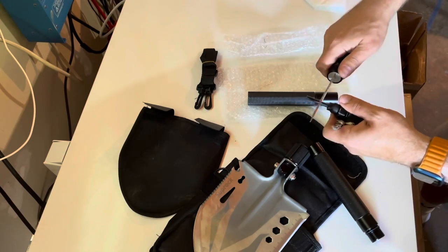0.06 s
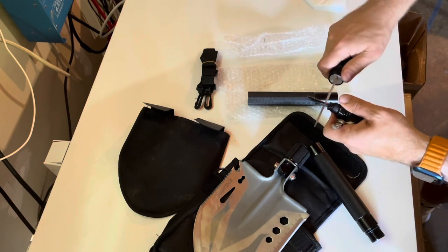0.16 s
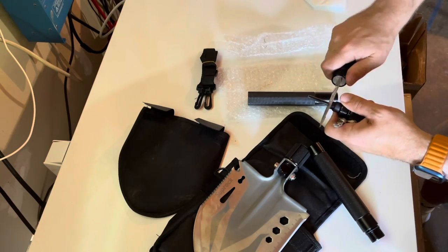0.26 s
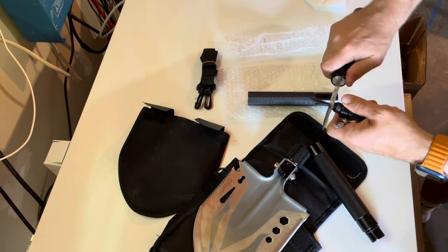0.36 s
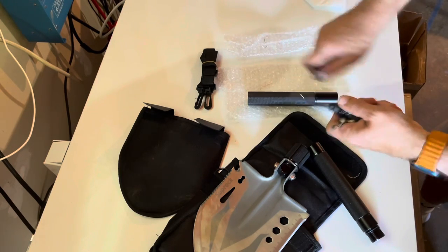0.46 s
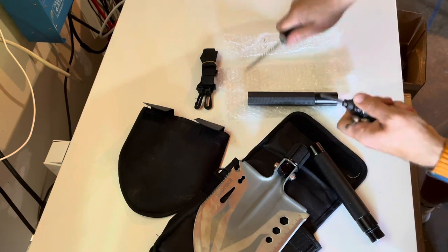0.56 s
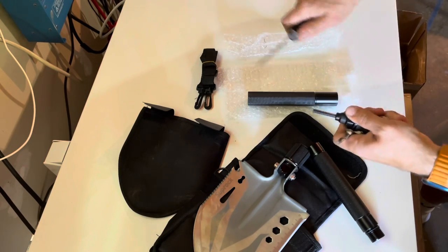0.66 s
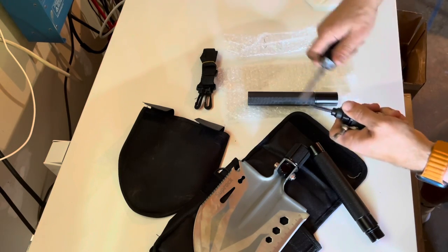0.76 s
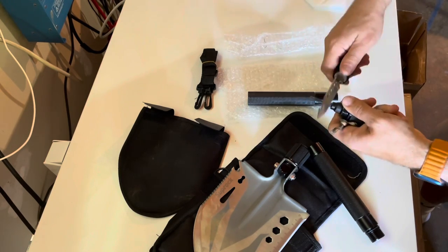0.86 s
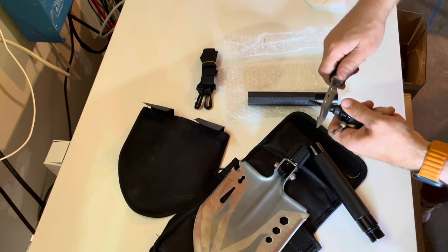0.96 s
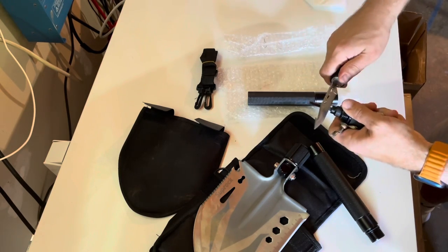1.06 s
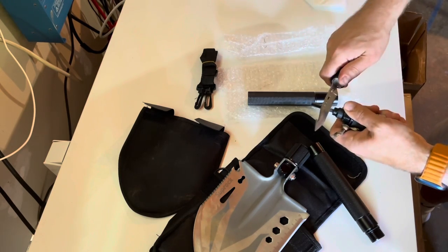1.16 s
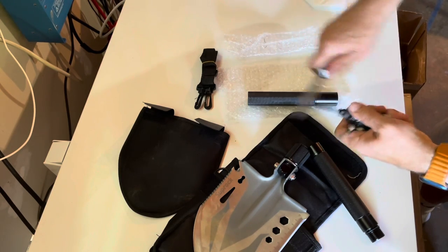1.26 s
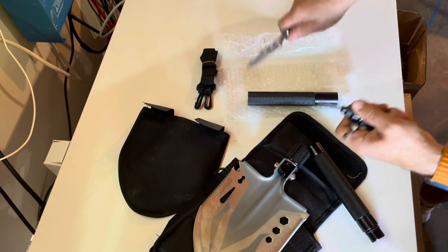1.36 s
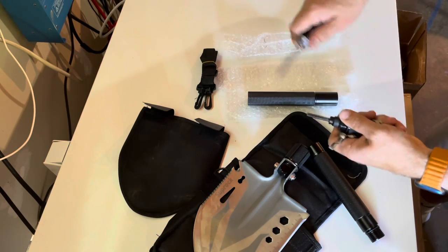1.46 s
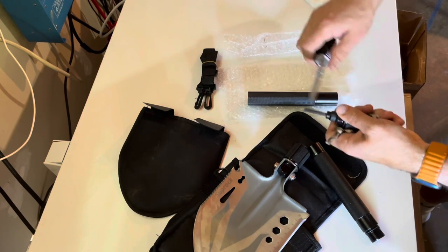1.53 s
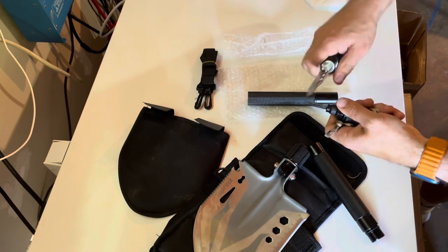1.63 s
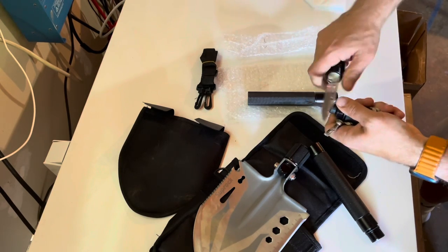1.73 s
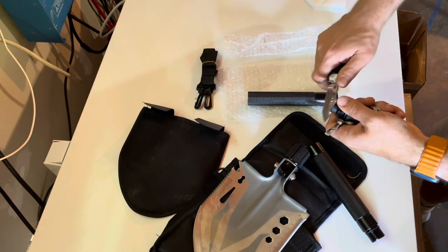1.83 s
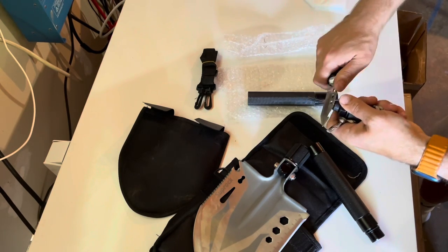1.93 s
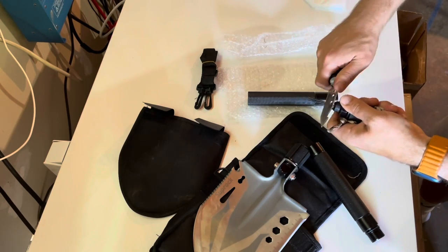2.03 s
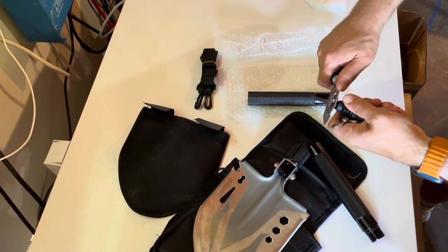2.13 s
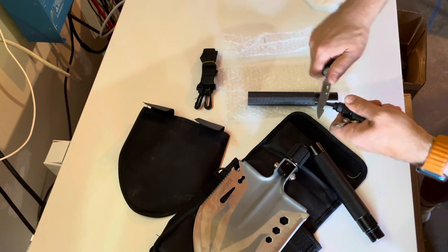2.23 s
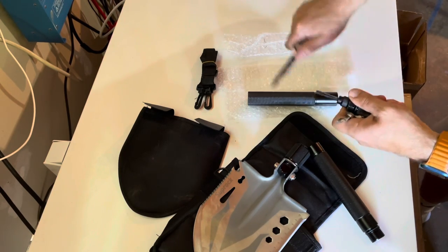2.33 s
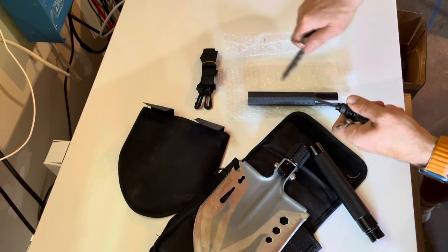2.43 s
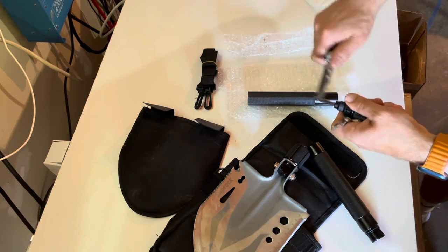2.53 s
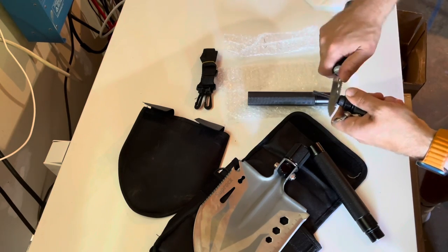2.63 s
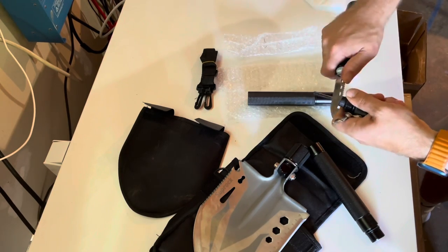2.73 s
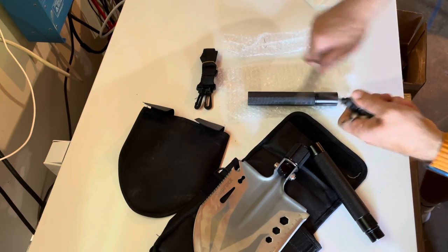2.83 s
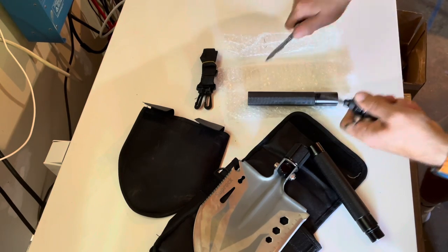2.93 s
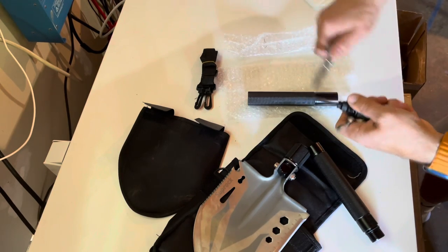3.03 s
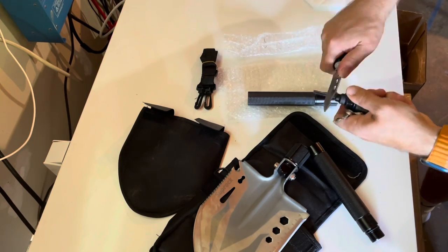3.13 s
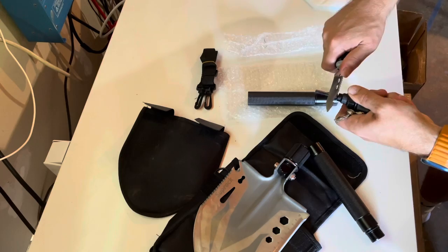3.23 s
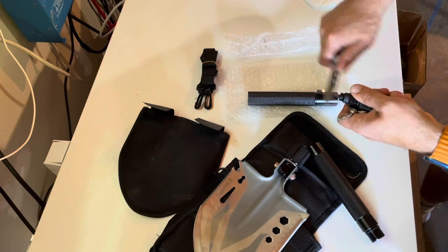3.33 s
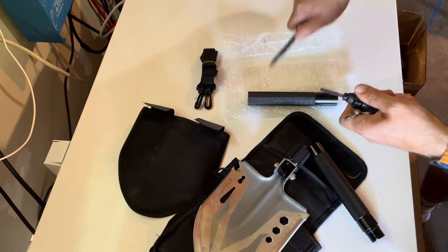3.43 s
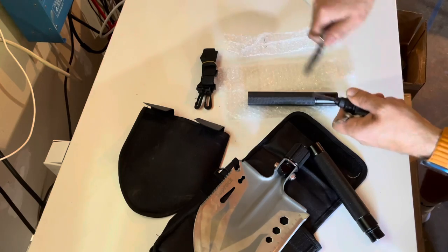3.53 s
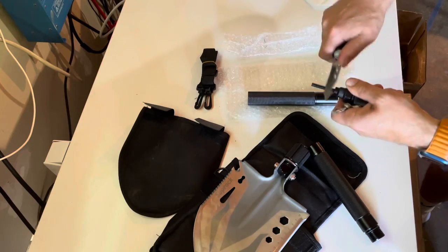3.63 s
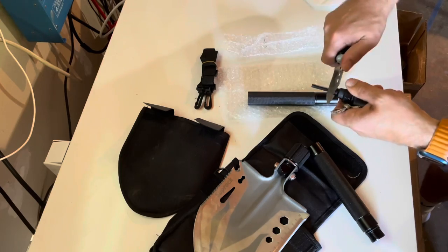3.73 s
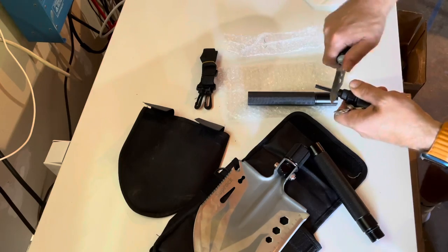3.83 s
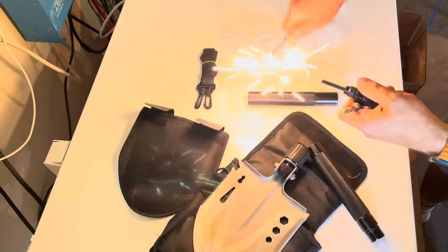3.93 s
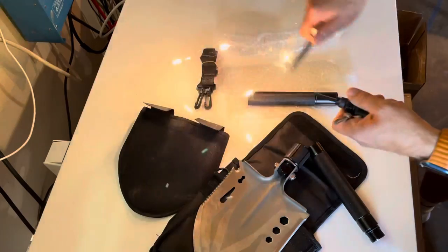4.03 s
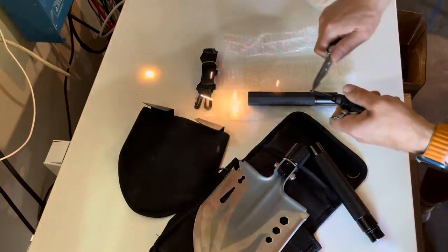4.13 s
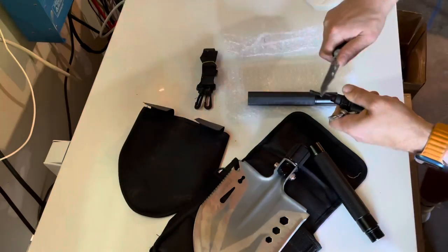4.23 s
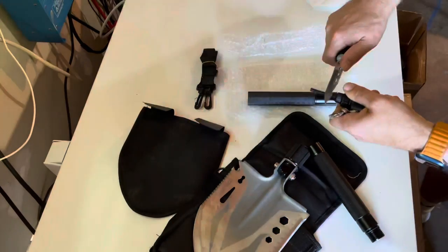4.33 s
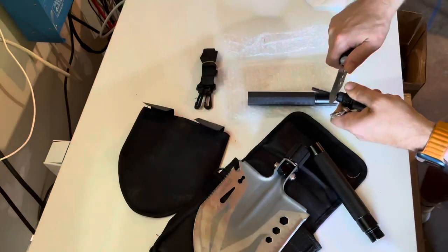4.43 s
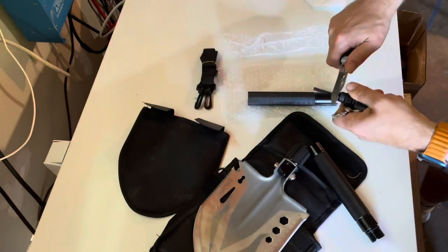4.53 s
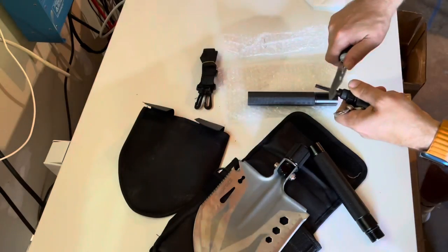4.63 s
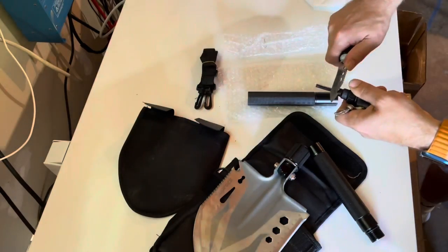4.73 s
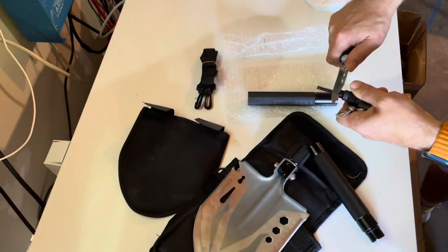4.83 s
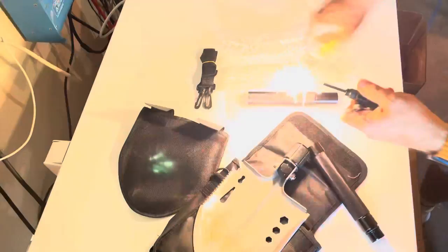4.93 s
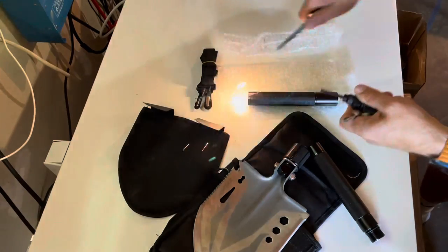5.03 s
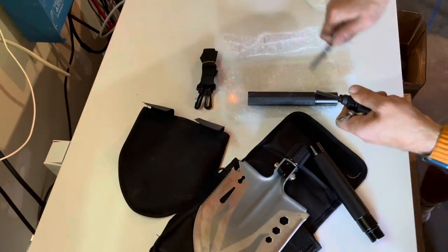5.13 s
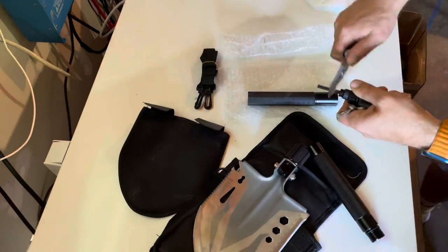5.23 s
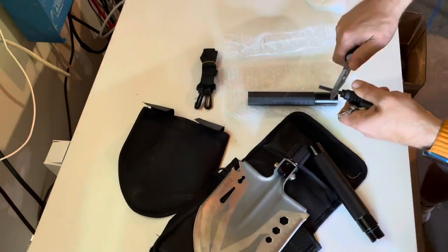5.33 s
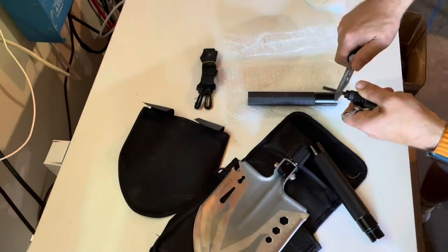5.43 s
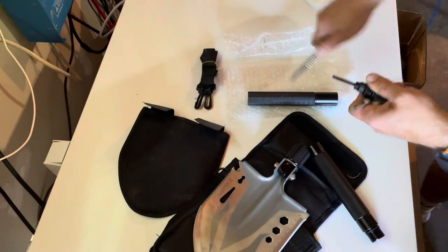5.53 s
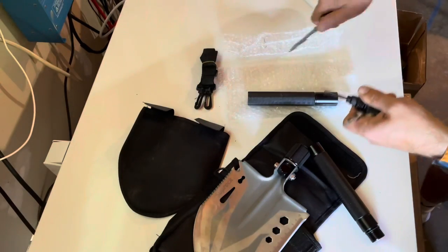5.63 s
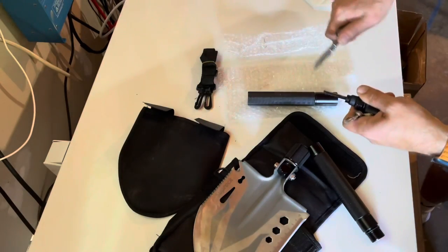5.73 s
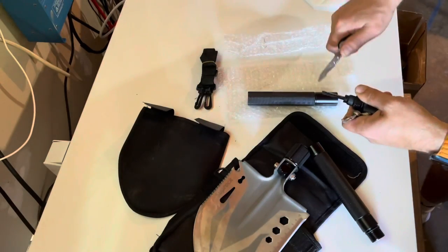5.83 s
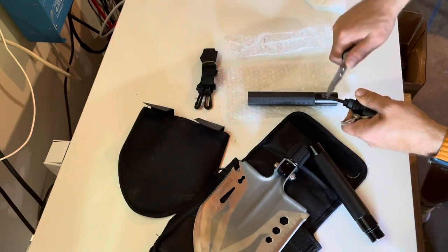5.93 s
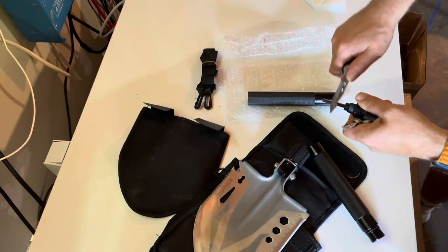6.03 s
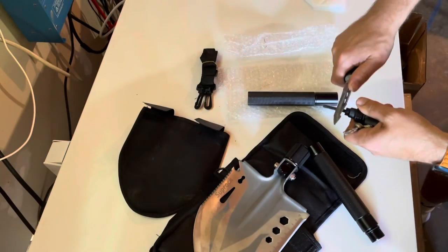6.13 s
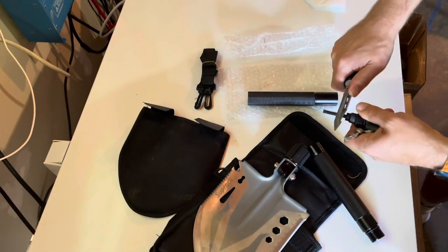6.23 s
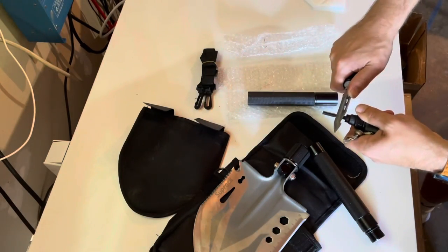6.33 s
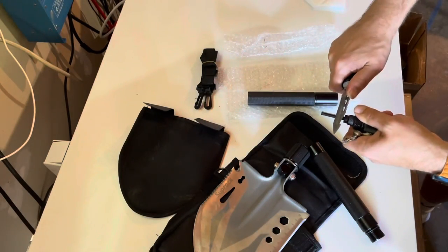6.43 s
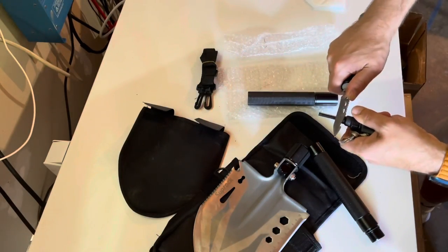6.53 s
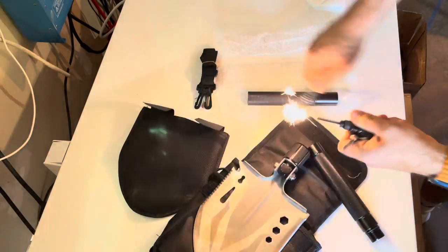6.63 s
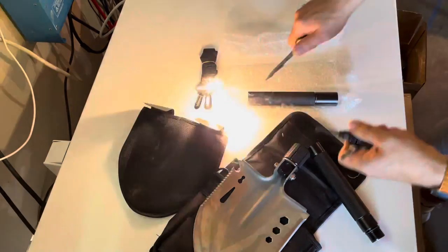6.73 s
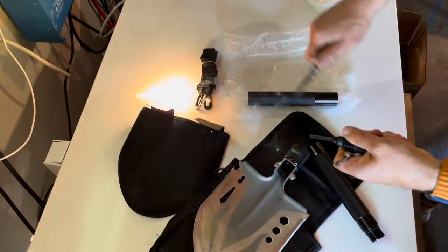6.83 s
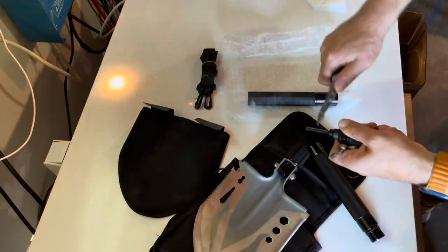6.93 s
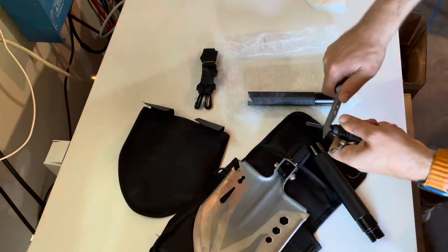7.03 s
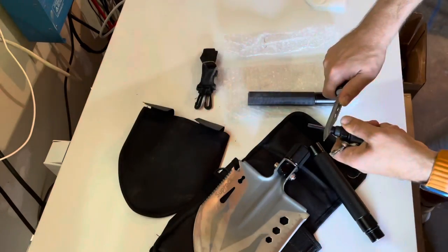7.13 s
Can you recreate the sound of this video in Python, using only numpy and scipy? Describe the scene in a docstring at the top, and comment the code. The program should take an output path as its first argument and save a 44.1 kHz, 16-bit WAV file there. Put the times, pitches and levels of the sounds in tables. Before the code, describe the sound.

Sharp metallic clicks and short hissing scrapes of a knife on a fire-starter rod, a few throwing softly fluttering sparks indoors.

```python
"""A steel blade taps onto a fire-starter rod and scrapes along it, again and again, over a table indoors.
Torn-off grit hisses, the blade rings and chirps, and the rod hums in its holder. One hard stroke
sticks and slips into a squeal; a few throw sparks that burn with a low flutter. A small room answers
and ventilation rumbles faintly. Two close microphone ports hear it all with a phase turn in the treble."""
import sys
import numpy as np
from scipy import signal
from scipy.fft import rfft, irfft, next_fast_len
from scipy.io import wavfile
from scipy.ndimage import uniform_filter1d, map_coordinates

SR = 44100
rng = np.random.default_rng(int(sys.argv[2]) if len(sys.argv) > 2 else 0)


def wav_out(sig):
    """Save sig, one row per channel (or a flat mono array), as 16-bit PCM at SR to the path in sys.argv[1]."""
    wavfile.write(sys.argv[1], SR, np.round(np.clip(np.atleast_2d(sig).T, -1, 1) * 32767).astype(np.int16))


N = 316058

# Resonances of the steel blade: pitch_hz, width_hz, level_db
BLADE_MODES = [(1215, 66, 2), (1232, 12, -4.5), (2610, 200, 1), (2740, 9.8, 4.5), (2730, 80, -6),
               (3507, 150, 4), (3980, 110, -6.5), (5585, 120, 4.5), (6500, 440, -8), (7800, 310, 2.5),
               (9210, 1200, -5.5), (10840, 450, 2), (11740, 180, -5), (13100, 81, -5.5), (14800, 400, -10)]
# Course of the squealing stroke: time_s, slip_rate_hz, slip_db, tilt_db_per_overtone, grit_db, bright_db
SQUEAL_CURVE = [(.449, 1140, -61.5, -3, -47, -41.5), (0.451, 1183, -27.5, -1.5, -42, -35),
                (0.457, 1183, -19.5, 0, -36, -35), (.464, 1233, -20.5, 0.74, -30.5, -33.5),
                (0.47, 1290, -18, -0.01, -21.5, -19), (0.476, 1343, -24, -1.5, -27, -26.5),
                (0.481, 1340, -47.5, -1.4, -47.5, -41.5)]


def blade_on_rod():
    """Torn-off grit hisses in three bands and sets the rod humming; the blade rings, squeals and chirps."""
    # Low band of scrapes and taps: freq_hz, level_db
    body_eq = [(200, -48.5), (450, -22.5), (700, -4), (1000, 1), (2000, -1.5), (2800, -14), (5000, -59)]
    # Middle band of a scrape: freq_hz, level_db
    grit_eq = [(800, -59.5), (1700, -19), (2400, -4), (4000, -1), (6000, -1), (7800, -3.5), (9000, -10.5),
               (14000, -59)]
    # Middle band of a tap: freq_hz, level_db
    tick_eq = [(800, -59.5), (1700, -19), (2400, -11), (3200, 1.5), (4200, 1), (6000, -1.5), (7800, -5.5),
               (9000, -19.5), (14000, -60)]
    # Top band of scrapes and taps: freq_hz, level_db
    bright_eq = [(4000, -62.5), (7000, -21.5), (8300, 3), (10500, 3.5), (12500, -2), (15600, -4),
                 (15900, -32.5), (17000, -37)]
    rod_hz, rod_width_hz, ring_db = 519, 30, -16
    scrape, tap = strokes(), taps()
    _, body, bright, hum = scrape + tap
    middle = scrape[0] * coloured(grit_eq, patchy_db=2.5) + tap[0] * coloured(tick_eq, patchy_db=0)
    hiss = middle + body * coloured(body_eq, patchy_db=3.1) + bright * coloured(bright_eq, patchy_db=2.0)
    bending = hum * np.cos(2 * np.pi * rod_hz * np.arange(N) / SR + 2.4 * wobble(30))
    rod = filtered(bending, lambda hz: modes([(rod_hz, rod_width_hz, 4)], hz)) * [[1], [.4]]
    ring = amp(ring_db) * filtered(hiss, lambda hz: modes(BLADE_MODES, hz))
    return hiss + ring + rod + squeal() + chirps()


def strokes():
    """The edge scrapes, catching and letting go unevenly: envelopes of grit, body, brightness, rod hum."""
    # Pushes along the rod: bite_s, rise_s, hold_s, release_s, grit_db,
    # body_offset_db, bright_offset_db, hum_offset_db (offsets from the grit)
    pushes = [(.168, 0.081, 0.002, 0.043, -59.5, -9, -9, -17),
              (0.222, 0.017, 0.001, 0.0027, -58, 0.5, -13, -26),
              (0.455, 0.023, 0.0011, .002, -44, -9.5, -5, -13),
              (0.676, 0.016, 0.022, .025, -71, -12, 4, -9),
              (0.814, .012, 0.0268, 0.0029, -62.5, -13, -0.5, -15),
              (1.159, 0.013, 0.03, .003, -66.5, -10.5, 2.5, -20),
              (1.198, 0.012, .002, 0.023, -49, -9, 1.5, -11),
              (1.248, .012, .008, 0.0046, -40, -5.5, 0, -27),
              (1.265, 0.0088, .006, 0.025, -28, -15.5, 7.5, -24),
              (1.593, .05, 0.076, 0.062, -85, -15, 14, 0), (2.187, 0.034, .006, .012, -41, -5, 7.5, -1),
              (2.22, .004, 0.0058, .004, -41, -7, 5.5, -3),
              (2.231, .011, .008, .012, -31, -11.5, 0.5, -19.5),
              (2.798, 0.049, 0.0025, 0.019, -37, -8, 3.5, -19),
              (3.315, 0.019, .002, .012, -39.5, -12.5, -0.5, -10),
              (3.326, 0.012, .011, 0.019, -37, -6, 2.5, -5.5),
              (3.819, 0.011, 0.013, 0.0032, -46.5, -5.5, 3, -1.5),
              (3.844, 0.014, .004, 0.016, -30.5, -14, -1, -8),
              (3.865, 0.018, .015, 0.057, -35, -5.5, 3, -17),
              (3.924, 0.024, 0.0016, 0.02, -42, -7.5, 4, -32.5),
              (4.355, 0.048, 0.017, .035, -53, -13, -8.5, -25),
              (4.898, 0.011, .012, 0.0031, -50, -7.5, 3.5, -0.5),
              (4.914, 0.0056, .004, 0.0047, -43.5, -6, 0.5, -19),
              (4.924, .011, .03, 0.032, -34, -6.5, 2.5, -20),
              (5.495, 0.028, .009, 0.0026, -37.5, -7.5, 0.5, -12.5),
              (6.499, 0.036, 0.0023, .04, -64.5, -2, -6.5, -24.5),
              (6.593, 0.011, .015, .003, -49, -7.5, 8, -9.5),
              (6.62, 0.011, .055, 0.033, -34, -10.5, 2, -21),
              (6.698, 0.024, .022, 0.0094, -39, -11, 0, -15), (6.746, .011, .002, .03, -61, 2, 10, -15),
              (6.783, .005, 0.0022, 0.035, -57, -13, -5, -16)]
    rise_depths, release_depths = [0.88, 0.85, 1.05, 0.46], [1.7, 0.91, 1.6, .9]  # one per envelope
    envelopes = np.zeros((4, N))
    for *timing, grit_db, body_db, bright_db, hum_db in pushes:
        layers = zip([0, body_db, bright_db, hum_db], rise_depths, release_depths)
        envelopes += [swell(*timing, grit_db + offset_db, up, down) for offset_db, up, down in layers]
    times_s, *_, grit_db, bright_db = np.transpose(SQUEAL_CURVE)  # the squealing stroke hisses too
    envelopes[[0, 2]] += [gated_gain(times_s, grit_db), gated_gain(times_s, bright_db)]
    catch_db = 1.3 * wobble(180) + 1.4 * wobble(900) + 1.2 * np.abs(wobble(1500))
    return envelopes * unit(amp(catch_db))


def taps():
    """The blade lands on the rod: fast-dying envelopes of tick, body, brightness, rod hum."""
    # Touches of the blade: start_s, level_db, body_offset_db, bright_offset_db, t60_s
    touches = [(0.0819, -34.5, -9, -10, 0.017), (0.2306, -37.5, -9.5, -12.5, 0.019),
               (0.2342, -34.5, -14.5, -8.5, 0.028), (0.3645, -48.5, -5, -6, 0.054),
               (0.8113, -56, -22, -8, 0.03), (0.8892, -34, -9, -2, 0.053), (0.902, -28.5, -10.5, -13, 0.03),
               (1.8678, -27, -15, 0, 0.025), (1.8738, -31.5, -9, -8, 0.024), (2.432, -61, -17.5, 8.5, 0.03),
               (2.588, -25.5, -8.5, 1, 0.022), (2.6622, -41.5, -7, -5, 0.049),
               (3.0652, -26.5, -14, -8, 0.036), (3.486, -62.5, -15, -1, 0.025),
               (3.6119, -31, -13, -4, 0.038), (4.0764, -53.5, 0, 2, 0.039),
               (4.2756, -30.5, -10, -0.5, 0.028), (4.367, -44, -14, -12, 0.028),
               (4.6787, -36, -14, -10, 0.036), (5.2631, -27.5, -12, -1, 0.028),
               (5.5056, -15, -9.5, 5.5, 0.014), (6.0936, -41, -10, -7.5, 0.028),
               (6.8422, -59, -9.5, 9, 0.023), (7.0545, -33.5, -13.5, -1, 0.03)]
    attack_s, hum_offset_db = .001, -21
    lead_s, lead_db = 0.0094, -21  # a faint dull tick just ahead of every tap
    envelopes, t = np.zeros((4, N + SR)), np.arange(SR // 8) / SR
    attack = 1 - np.exp(-t / attack_s)
    for start_s, level_db, body_db, bright_db, t60_s in touches:
        balance = amp([0, body_db, bright_db, hum_offset_db])[:, None]
        decay = amp(level_db - 60 * t / t60_s)
        envelopes[:, round(start_s * SR):][:, :len(t)] += balance * decay * attack
    envelopes[0] += amp(lead_db) * np.roll(envelopes[0], -round(lead_s * SR))
    return envelopes[:, :N]


def squeal():
    """The edge sticks and slips at a climbing rate; every slip knocks the blade's modes."""
    times_s, rate_hz, slip_db, tilt_db = np.transpose(SQUEAL_CURVE)[:4]
    t = np.arange(N) / SR
    cycles = np.cumsum(np.interp(t, times_s, rate_hz)) / SR
    cycles += 0.021 * wobble(1200)  # slips come slightly early or late
    tilt = amp(np.interp(t, times_s, tilt_db))
    slips = sum(tilt ** k * np.cos(2 * np.pi * (k + 1) * cycles) for k in range(12))
    drive = gated_gain(times_s, slip_db) * slips * amp(3.1 * wobble(1200))
    return filtered(drive, lambda hz: modes(BLADE_MODES, hz)) * [[1], [-.3]]


def chirps():
    """The edge briefly locks on to one resonance, which swells, wavers and rings out."""
    # Moments of locking on: start_s, length_s, pitch_hz, level_db
    locks = [(0.077, 0.009, 4070, -46), (0.13, 0.073, 11790, -67), (0.204, 0.041, 11700, -58),
             (.366, 0.025, 1610, -62.5), (0.9, 0.013, 4230, -41), (1.189, 0.014, 1677, -57),
             (1.241, 0.016, 1705, -46), (1.259, 0.013, 5930, -28.5), (1.26, 0.0087, 10000, -30.5),
             (1.263, 0.012, 7730, -31), (1.871, 0.021, 4147, -46.5), (2.179, 0.0056, 11100, -37),
             (2.186, 0.013, 1048, -48), (2.221, 0.0058, 8840, -36), (2.762, 0.031, 14440, -57),
             (3.0624, 0.006, 1000, -43), (3.821, 0.021, 1800, -53), (4.322, 0.046, 1262, -62.5),
             (4.571, 0.027, 8680, -70.5), (4.907, .012, 1877, -43.5), (5.5055, 0.0037, 5630, -28.5),
             (6.089, 0.0095, 1055, -56.5), (6.601, 0.013, 14820, -45), (6.608, .015, 1820, -54)]
    out = np.zeros((2, N + SR))
    for start_s, length_s, pitch_hz, level_db in locks:
        width_hz = 110 * (pitch_hz / 1000) ** 0.66  # higher resonances are wider
        drive = np.pad(np.hanning(round(length_s * SR)) ** .5, (0, SR // 8))
        loss = np.pi * width_hz / SR
        envelope = signal.lfilter([loss], [1, loss - 1], drive)
        wavering_hz = pitch_hz + .45 * width_hz * wobble(700)[:len(drive)]
        tone = np.sin(2 * np.pi * np.cumsum(wavering_hz) / SR + rng.uniform(0, 2 * np.pi, (2, 1)))
        out[:, round(start_s * SR):][:, :len(drive)] += amp(level_db + 8.0) * envelope * tone
    return out[:, :N]


def sparks():
    """A low flutter as the shavings burn."""
    # Sparks catching fire: peak_s, rise_s, hold_s, release_s, level_db
    flares = [(3.867, 0.031, 0.0295, .05, -45.5), (4.936, .04, .021, .05, -46),
              (6.645, 0.036, 0.093, .021, -43.5)]
    # Colour of the flame: freq_hz, level_db
    flame_eq = [(60, -38), (120, -4), (200, 0), (400, 2.5), (700, -8.5), (1500, -40.5)]
    return sum(swell(*flare) for flare in flares) * coloured(flame_eq, patchy_db=5.0)


def room(pair, wet_db):
    """The walls answer, each frequency dying at its own speed; a new tail every tenth of a second."""
    # Decay of the small room: freq_hz, t60_s
    decay_times = [(300, 0.33), (1000, 0.13), (3000, .24), (8000, .2), (15000, 0.081)]
    out = np.zeros((2, N + SR))
    step, tail_length, predelay = SR // 10, SR // 3, 200  # samples
    for at in range(0, N, step):
        hz, t, noise = signal.stft(rng.standard_normal((2, tail_length)), SR, nperseg=256)
        decay = amp(-60 * t / along(decay_times, hz)[:, None])
        tail = signal.istft(noise * decay, SR, nperseg=256)[1]
        answer = signal.fftconvolve(pair[:1, at:at + step], tail / np.linalg.norm(tail[0]), axes=1)
        out[:, at + predelay:][:, :answer.shape[1]] += answer
    return amp(wet_db) * out[:, :N]


def ventilation():
    """An unsteady low rumble, a thin hiss, a few narrow whistling bands and a slightly wavering hum."""
    # Level ride of the rumble: time_s, level_db
    rumble_ride = [(0.0, -56), (0.04, -51.5), (1.08, -51.5), (1.71, -50), (2.09, -51), (3.03, -48),
                   (4.55, -51), (4.63, -46.5), (4.67, -49.5), (5.78, -47), (5.8, -46), (5.86, -49),
                   (7.02, -49), (7.16, -49)]
    # Colour of the rumble: freq_hz, level_db
    rumble_eq = [(8.8, -42.5), (15, -16), (75, -1), (180, -24.5), (209, -27.5), (261, -26.5), (394, -26.5),
                 (424, -21.5), (449, -36), (474, -35), (729, -37.5), (1300, -46), (1690, -77), (2860, -120)]
    # Colour of the hiss: freq_hz, level_db
    hiss_eq = [(600, -37.5), (1200, -11), (2200, -12), (4500, -23.5), (8000, -20.5), (12000, -20.5),
               (15200, -19), (15800, -46)]
    # Whistling resonances, each as one of two filter passes: pitch_hz, width_hz, level_db
    whistle_modes = [(480, 15, 2), (1600, 200, -2), (3450, 300, .3), (5800, 700, -11), (9550, 600, -4),
                     (10050, 380, 0)]
    t, hum_hz = np.arange(N) / SR, 426
    rumble = amp(np.interp(t, *np.transpose(rumble_ride))) * coloured(rumble_eq, patchy_db=1.3)
    hiss = amp(-80.5) * coloured(hiss_eq, patchy_db=1.2)
    air = rng.standard_normal((2, N))
    whistle = amp(-70.5) * unit(filtered(air, lambda hz: modes(whistle_modes, hz) ** 2))
    hum = amp(-67 + 1.4 * wobble(4.0)) * np.sin(2 * np.pi * hum_hz * t + 0.27 * wobble(5))
    return rumble + hiss + whistle + hum * [[1], [.3]]


def ports(pair, likeness):
    """Two microphone ports hear a mid/side pair as left and right: partly alike, turned in phase."""
    # Phase turn between the ports: freq_hz, left_lead_rad
    phase_turn = [(0, 0), (2000, .05), (2700, .5), (4300, .6), (5100, 0), (6000, .4), (9200, 3.12),
                  (10900, 3.16), (14200, 6.2), (17000, 6.3)]

    def weights(hz, side):
        spread = np.arccos(np.clip(along(likeness, hz), 0, 1)) / 2
        turn = np.interp(hz, *np.transpose(phase_turn))
        return np.exp(side * 1j * turn / 2) * [np.cos(spread), side * np.sin(spread)]
    return np.array([filtered(pair, lambda hz: weights(hz, side)).sum(0) for side in (1, -1)])


def swell(peak_s, rise_s, hold_s, release_s, level_db, rise_depth=1, release_depth=1):
    """Envelope that creeps in, rises, sags while held and lets go, in straight lines of dB."""
    creep_db, sag_db = -25, -88.5 * hold_s
    onset_db, drop_db = -22.5 * rise_depth, -22.5 * release_depth
    times_s = [peak_s - 2 * rise_s, peak_s - rise_s, peak_s, peak_s + hold_s, peak_s + hold_s + release_s]
    shape_db = np.array([onset_db + creep_db, onset_db, 0, sag_db, sag_db + drop_db])
    return gated_gain(times_s, level_db + shape_db)


def gated_gain(times_s, levels_db):
    """Gain through the given points, with 2 ms fades to silence at both ends."""
    gain = np.zeros(N)
    span = slice(max(round(times_s[0] * SR) - 100, 0), round(times_s[-1] * SR) + 100)
    t = np.arange(N)[span] / SR
    gate = np.clip(np.minimum(t - times_s[0], times_s[-1] - t) / .002 + .75, 0, 1)
    gain[span] = gate * amp(np.interp(t, times_s, levels_db))
    return gain


def coloured(eq, patchy_db):
    """Two unrelated noises, equalised to rms 1, with random patches of gain in time and frequency."""
    noise = signal.stft(rng.standard_normal((2, N)), nperseg=256)[2]
    patches = uniform_filter1d(uniform_filter1d(rng.standard_normal(noise.shape[1:]), 4, 0), 5, 1)
    pair = signal.istft(noise * amp(patchy_db * unit(patches)), nperseg=256)[1][:, :N]
    return unit(filtered(pair, lambda hz: amp(along(eq, hz))))


def modes(table, hz):
    """Causal response of a bank of resonances with alternating polarity."""
    return sum((-1) ** k * amp(db) * 1j * hz * width / (pitch ** 2 - hz ** 2 + 1j * hz * width + 1e-9)
               for k, (pitch, width, db) in enumerate(table))


def filtered(x, response):
    """x through a complex frequency response."""
    size = next_fast_len(N + SR // 2)
    return irfft(rfft(x, size) * response(np.fft.rfftfreq(size, 1 / SR)), size)[..., :N]


def wobble(rate_hz):
    """A smooth random curve with rate_hz knots a second."""
    return map_coordinates(rng.standard_normal(int(N * rate_hz / SR) + 4), [np.arange(N) * rate_hz / SR])


def along(points, hz):
    """Curve through (freq_hz, value) points on a log frequency axis."""
    freqs_hz, values = np.transpose(points)
    return np.interp(np.log(hz + 1), np.log(freqs_hz + 1), values)


def amp(db):
    """Gain of a level in dB."""
    return 10 ** (np.asarray(db) / 20)


def unit(x):
    """x scaled to rms 1."""
    return x / np.sqrt(np.mean(x ** 2) + 1e-20)


def scene():
    """Blade and sparks up close, with the room and the ventilation behind them."""
    # Stereo image of the close sound: freq_hz, left_right_likeness
    near_image = [(150, 1), (700, .85), (1200, .98), (1900, .99), (3500, .82), (4700, .25), (5500, .92),
                  (7500, .82), (9300, .998), (11000, .995), (13000, .72), (14500, .99)]
    # Stereo image of the distant sound: freq_hz, left_right_likeness
    far_image = [(70, 1), (110, .997), (170, .95), (330, .75), (850, .05), (1800, .88), (3000, .45),
                 (3800, .6), (4700, .15), (6000, .8), (7500, .6), (9300, .998), (10800, .998), (13000, .6),
                 (14800, .97)]
    near = blade_on_rod() + sparks()
    far = room(near, wet_db=-9) + ventilation()
    return ports(near, near_image) * amp([[-.3], [.3]]) + ports(far, far_image)


def record(dry):
    """A brick-wall low-pass takes off the very top."""
    cutoff_hz = 16800
    return filtered(dry, lambda hz: hz < cutoff_hz)


dry = scene()
out = record(dry)
wav_out(out)
```